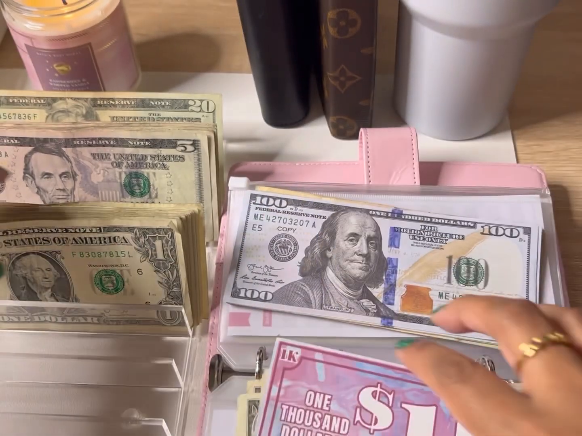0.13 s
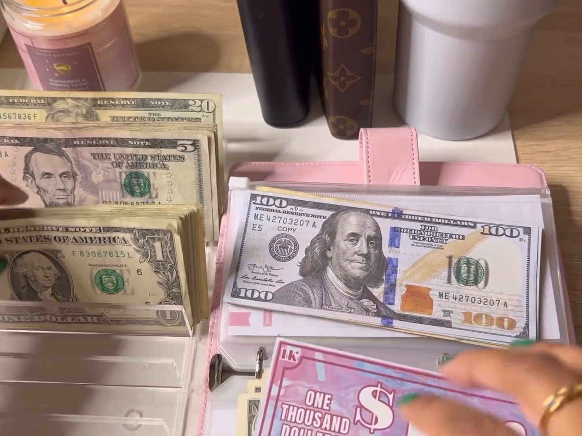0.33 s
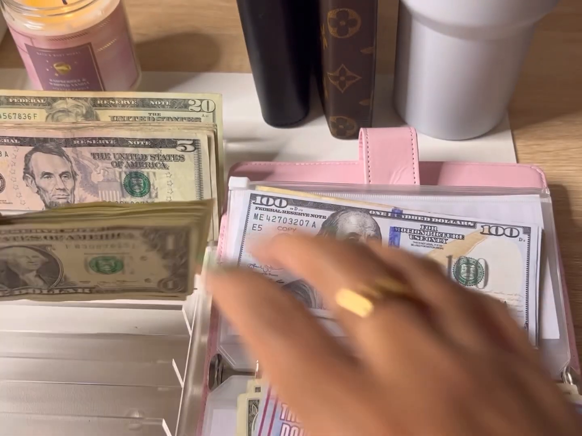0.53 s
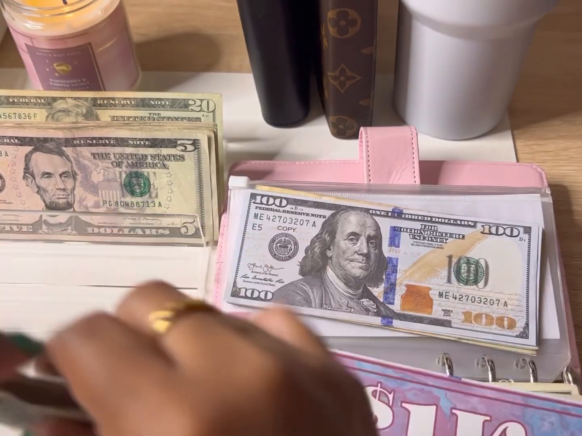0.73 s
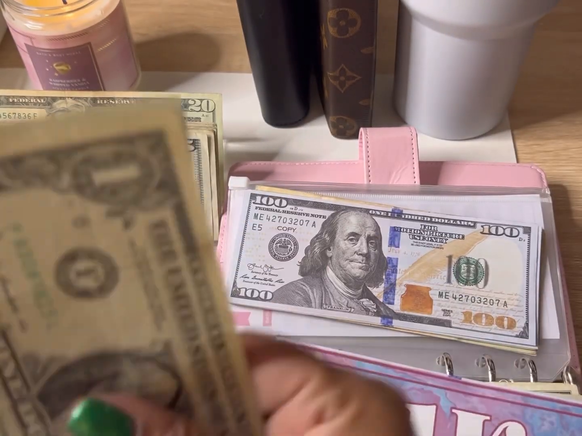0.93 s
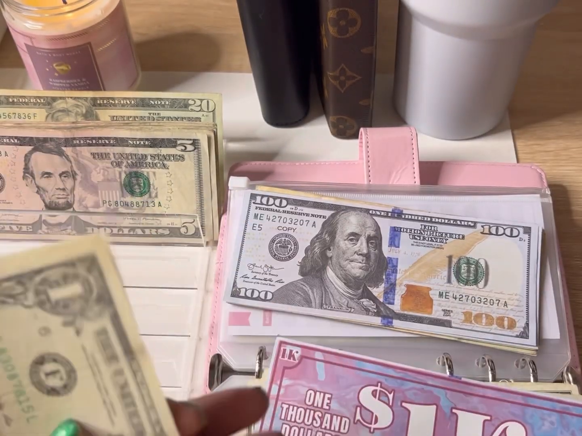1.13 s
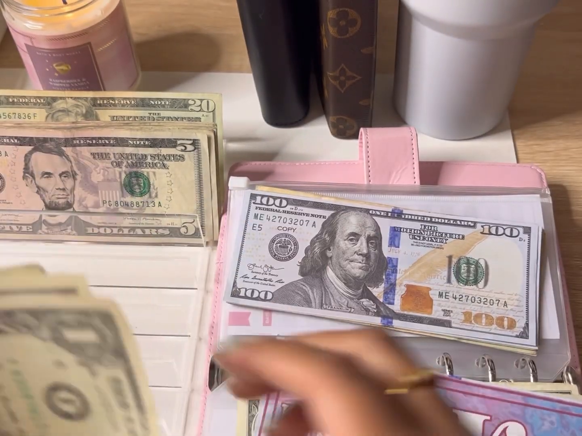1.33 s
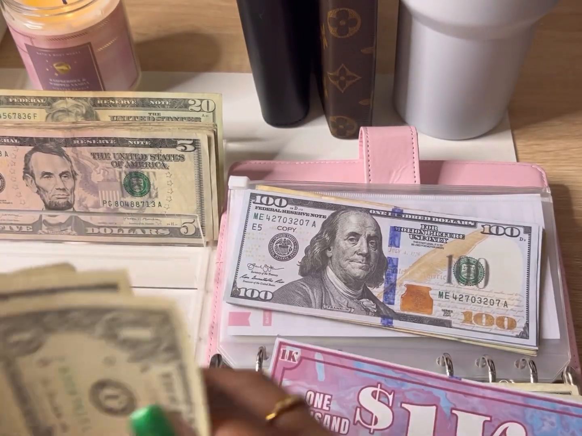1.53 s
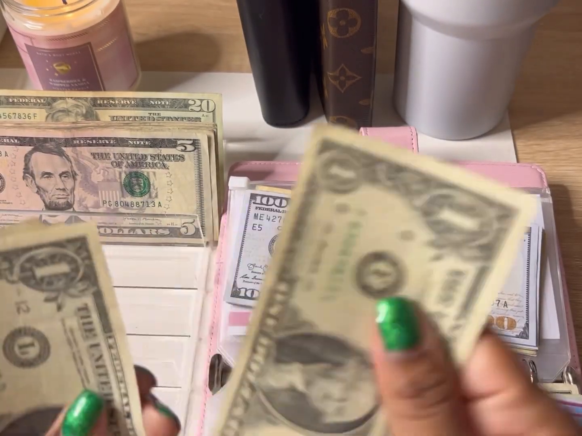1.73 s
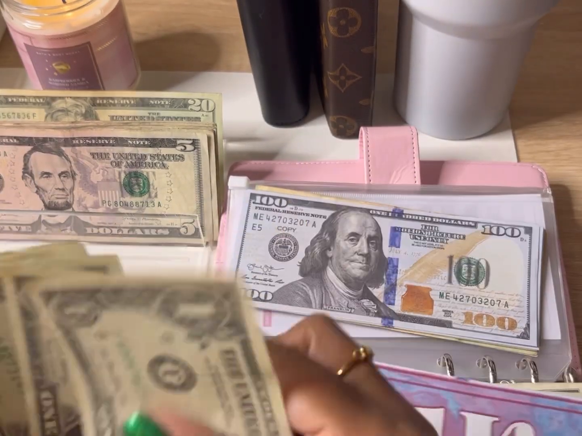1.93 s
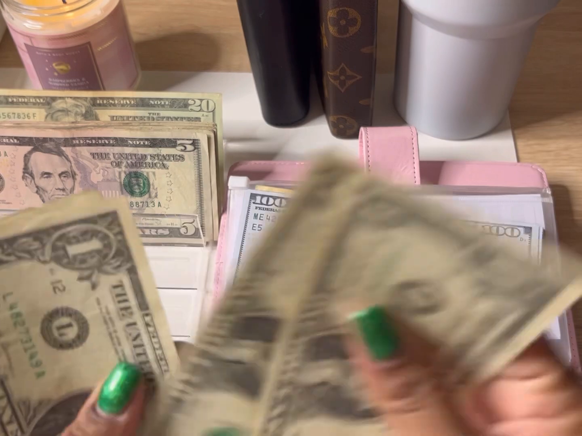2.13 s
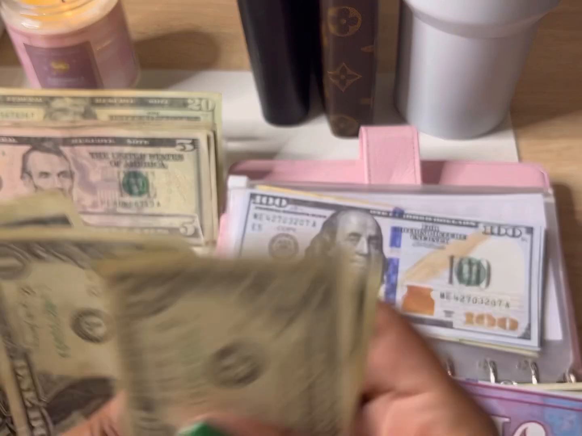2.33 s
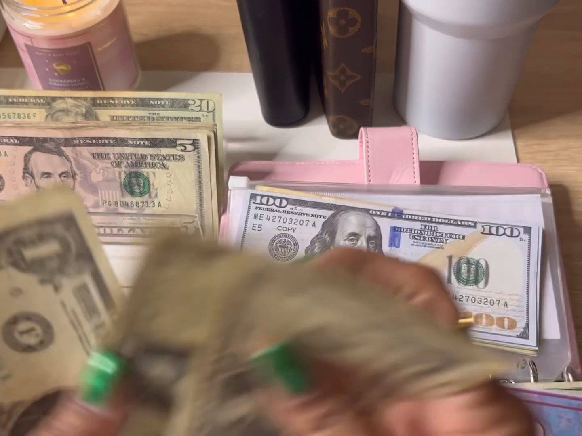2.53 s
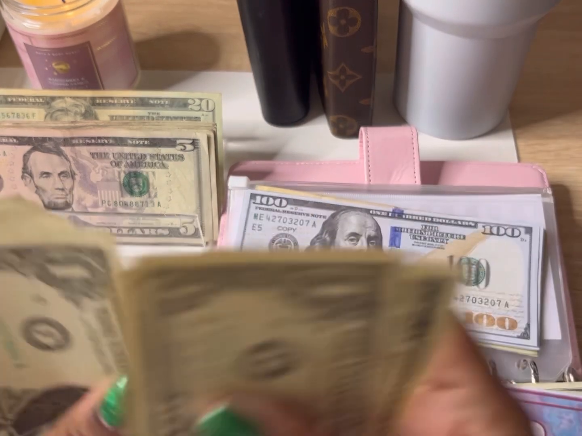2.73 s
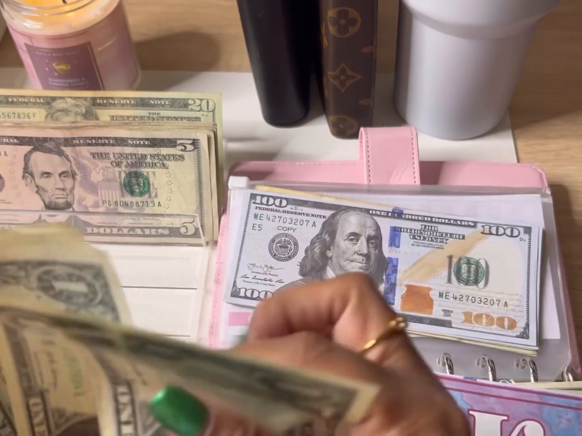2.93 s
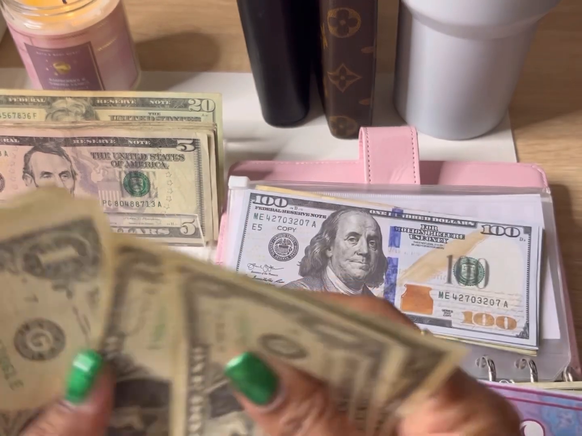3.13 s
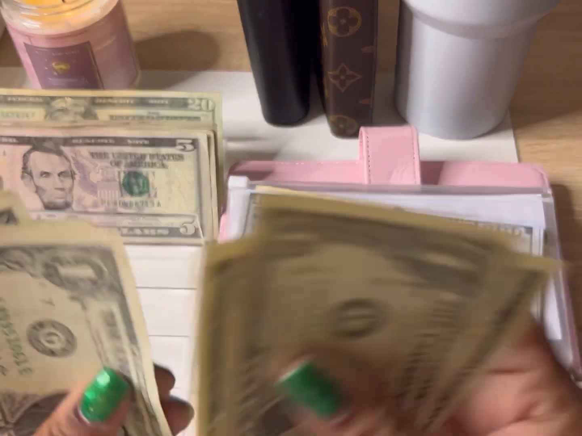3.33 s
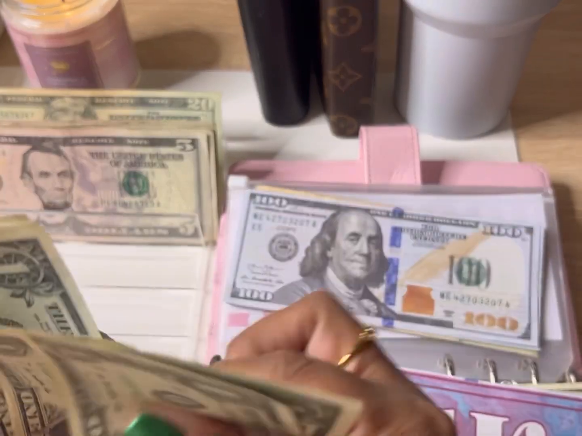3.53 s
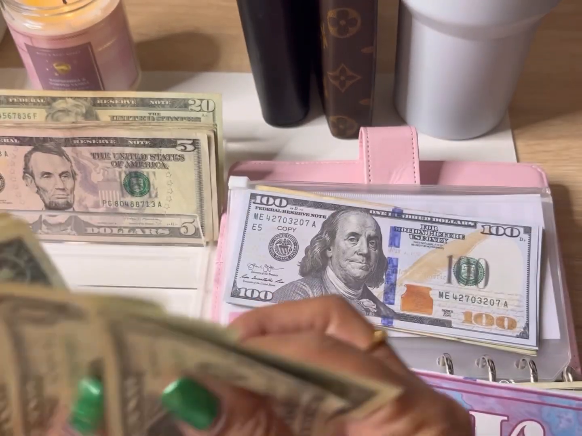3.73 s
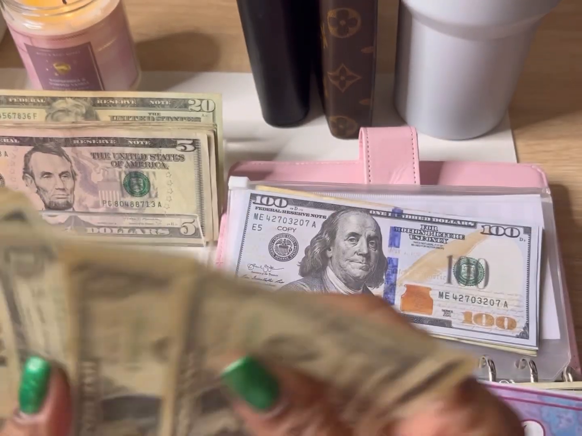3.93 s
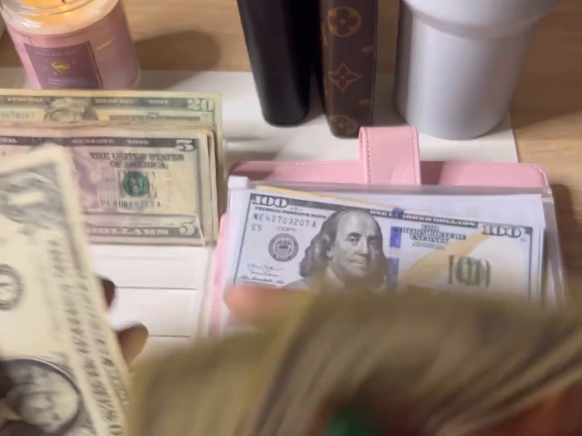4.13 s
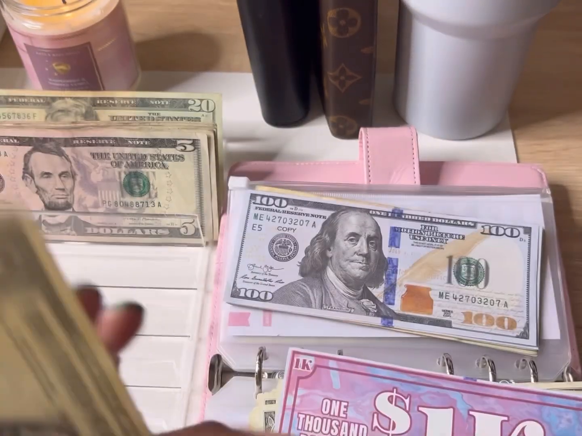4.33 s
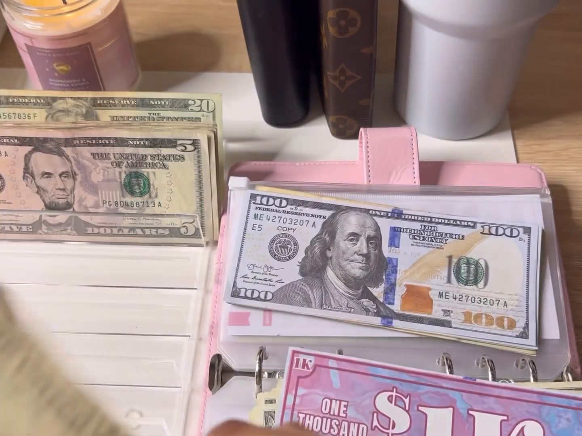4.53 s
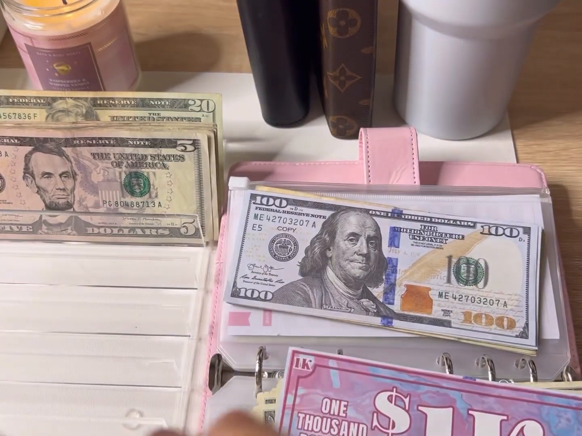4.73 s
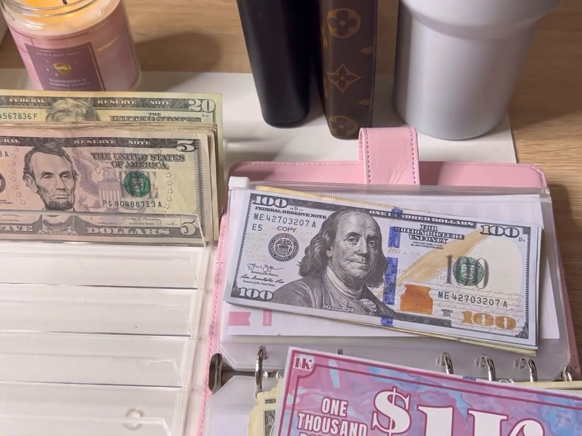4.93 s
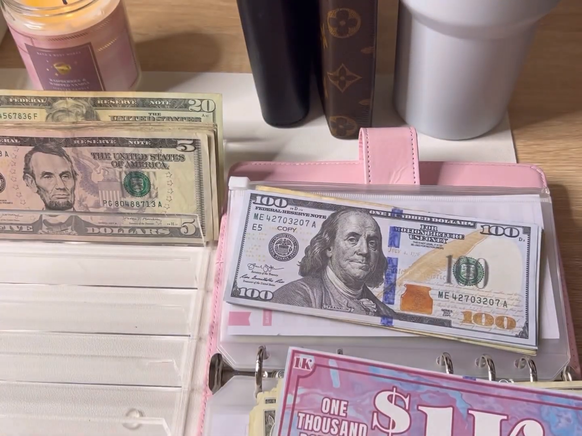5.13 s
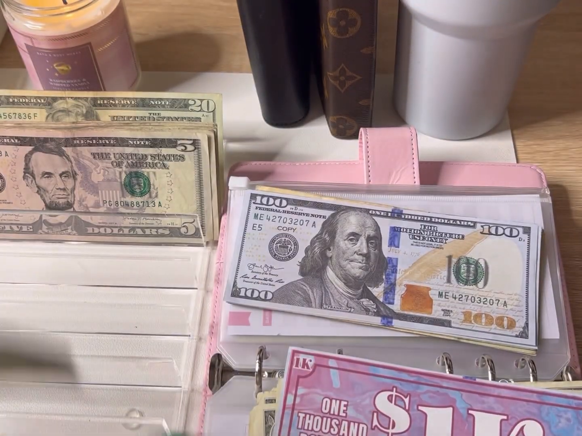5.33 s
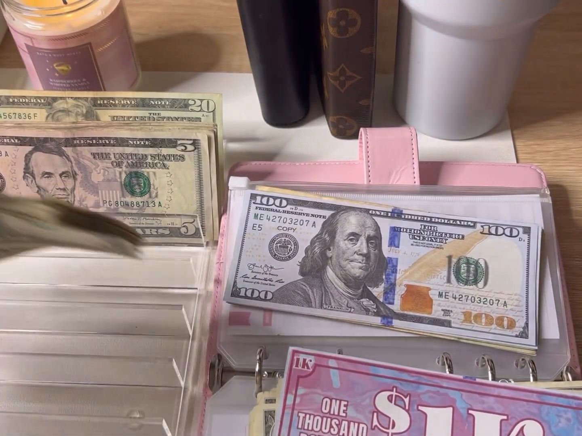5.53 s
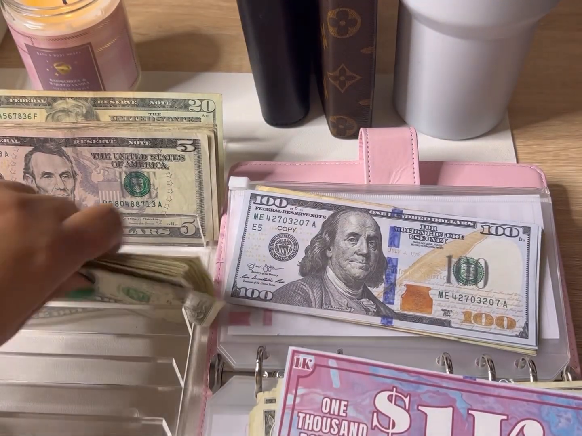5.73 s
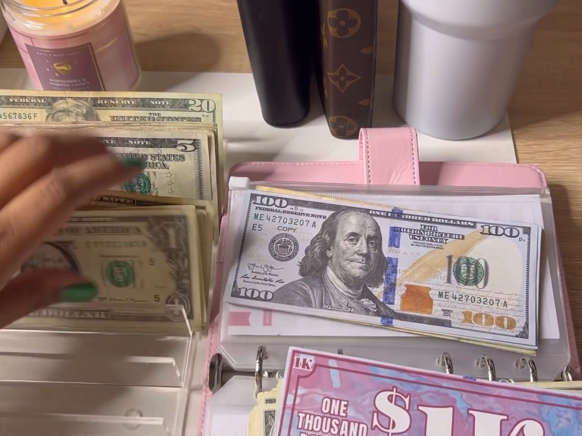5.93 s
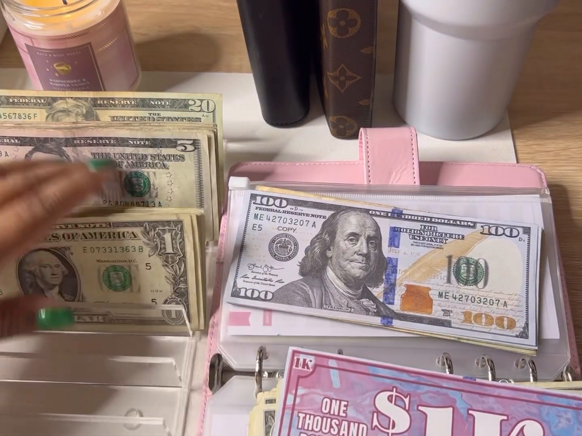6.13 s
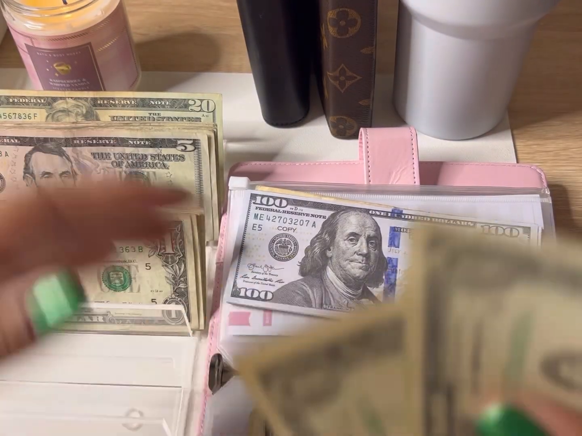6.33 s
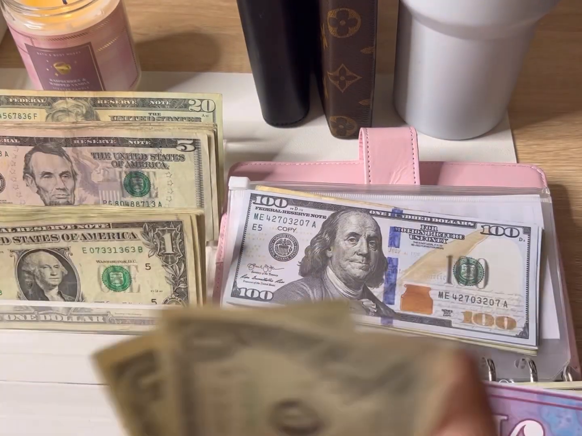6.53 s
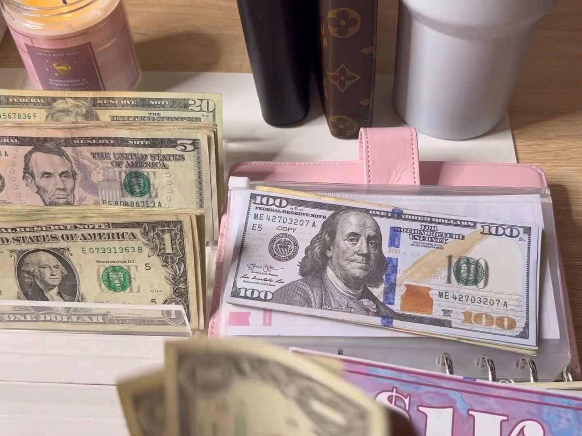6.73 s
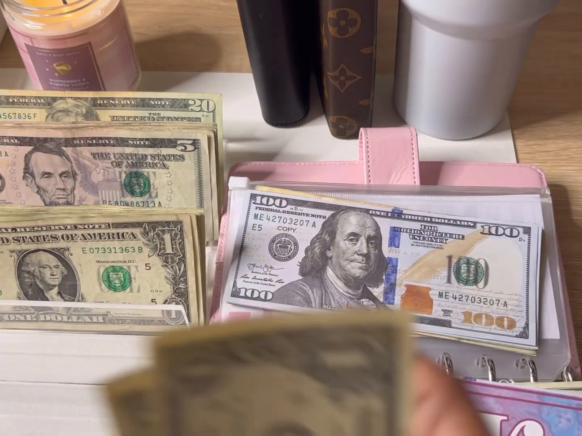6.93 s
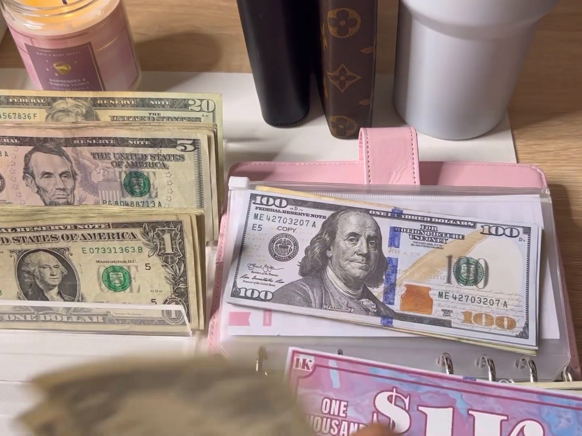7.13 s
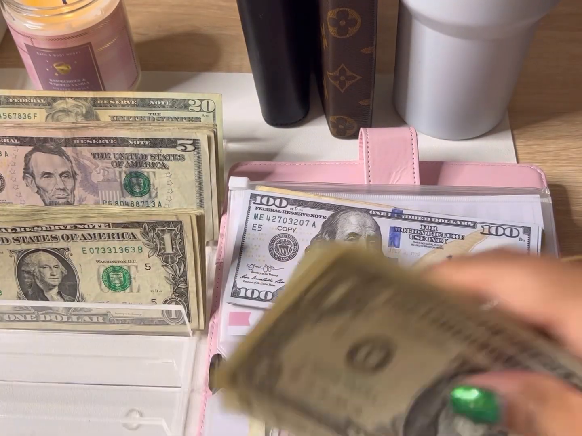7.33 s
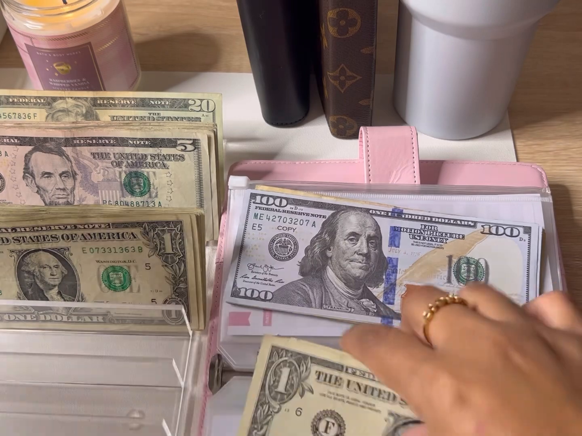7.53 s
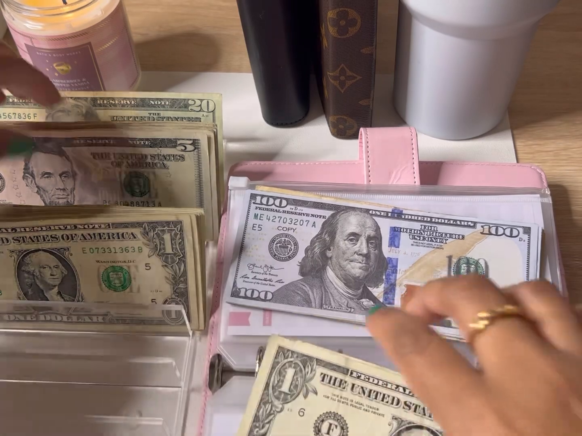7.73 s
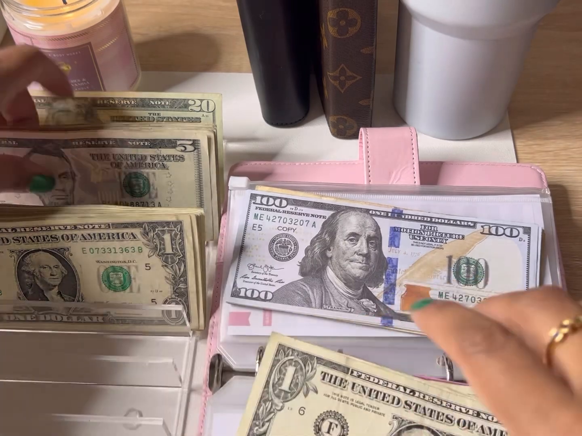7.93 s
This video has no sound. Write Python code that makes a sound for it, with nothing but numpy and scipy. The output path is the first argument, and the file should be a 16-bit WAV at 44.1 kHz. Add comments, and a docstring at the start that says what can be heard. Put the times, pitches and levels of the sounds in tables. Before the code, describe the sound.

Hands rub and draw banknotes over one another, quietly at first, then in a brisk irregular run of snaps, swishes and buckling sheets. After a muffled desk bump the movement eases into sparse rustles. A stack is squared and dropped into a hard plastic tray with short knocks, then a final small batch rustles and taps. Close stereo microphone, dry furnished room, faint low hum.

```python
"""Paper banknotes are pulled from a plastic tray, counted from hand to hand and put back, close by at a quiet desk.
From the start a low room hum (coloured noise) lies under hands that rub and sheets that slide in random stick-slip.
Soon creases snap and notes buckle (noise bursts around a pulse), and bending sheets flap (low bands of noise).
Near 4 and 6 s soft blows thump the desk (decaying low sines). After 5 s edges tap the tray (thicker bursts),
and wads knock on it (decaying sines at its modes)."""
import sys
import numpy as np
from scipy import signal
from scipy.io import wavfile

SR = 44100
rng = np.random.default_rng(int(sys.argv[2]) if len(sys.argv) > 2 else 0)


def materialize(psi):
    """Save the field psi as 16-bit PCM at rate SR to the path in sys.argv[1].

    A 1-D psi becomes a single channel; in a 2-D psi each row is a channel.
    """
    bounded = np.clip(np.atleast_2d(psi).T, -1, 1)
    quanta = np.round(bounded * 32767).astype(np.int16)
    wavfile.write(sys.argv[1], SR, quanta)


N = 352359

# Spectrum of rubbed paper. Each row: frequency in Hz, relative level per Hz in dB.
PAPER_SPECTRUM = [(45, -2), (72, 7.5), (680, -1), (1000, 4), (8000, 7), (16000, 2.5)]
# Fixed resonances that colour the paper sounds. Each row: frequency in Hz, width in Hz, boost in dB.
FIXED_RESONANCES = [(947, 93, 2.5), (1960, 37, 1.5)]
# Modes of the plastic tray. Each row: frequency in Hz, level relative to the knock in dB, t60 in seconds.
TRAY_MODES = [(264.5, 2, 0.092), (1163, -6, 0.11), (1560, 7, 0.051)]
# low flap, ringing sheet and bright crack: the three ranges of paper sound, in Hz
FLAP_BAND_HZ, SHEET_BAND_HZ, CRACK_BAND_HZ = (40, 700), (700, 3000), (3000, 17000)
BUILD_UP_S = .001  # small cracks grow over this time before the pulse of a contact


def sliding(hiss_gain, ring_gain, dull_hz=1600):
    """Stick-slip friction: fine fibres catch in a grainy hiss; coarser, rarer slips set the sheet ringing."""
    # a steady part is added to the random slips
    fibres = np.hypot(slips(per_s=480, size_db=5.5, length_s=0.0006), .7)
    catches = np.hypot(slips(per_s=190, size_db=5.5, length_s=0.0014), .6)
    hiss = coloured(fibres, PAPER_SPECTRUM, CRACK_BAND_HZ, wander_db=2.0)
    sheet = coloured(catches, PAPER_SPECTRUM, SHEET_BAND_HZ, wander_db=3.0)
    sheet = rms_one(resonate(sheet, FIXED_RESONANCES))
    # a slow stroke, with little hiss, rings dull
    quick = np.minimum(hiss_gain / ring_gain, 1)
    # reversed in time, the dull part is unrelated to the bright one
    dull_sheet = soften(np.fliplr(sheet), dull_hz)
    sheet = np.sqrt(quick) * sheet + np.sqrt(1 - quick) * dull_sheet
    return hiss_gain * hiss + ring_gain * sheet


def friction():
    """Power addition of unrelated noises: strokes and rubs sum to gains of hiss, sheet ring and rub."""
    # One note drawn over another. Each row: start in seconds, length in seconds, fastest moment as a share
    # of the length (0-1), friction hiss level in dB, ring of the sheet relative to the hiss in dB.
    strokes = [(0.22, 0.16, 0, -66.5, 5.5), (0.464, 0.048, 0.8, -62, 2.5), (0.68, 0.13, 0.17, -52.5, -2),
               (0.858, 0.25, 0.86, -61.5, -1.5), (1.074, 0.1, 0.93, -54, -3.5), (1.264, 0.14, 0.6, -57, -3),
               (1.46, 0.1, 0.9, -52, -7.5), (1.526, 0.16, 0.8, -41, -4), (1.704, 0.27, 0, -51, -8.5),
               (1.854, 0.39, 0.17, -53, 0), (1.997, 0.12, 0.45, -41, -6.5), (2.142, 0.33, 0.05, -51, -6),
               (2.335, 0.16, 0.1, -52.5, -1), (2.459, 0.11, 0.47, -41, -7.5), (2.56, 0.33, 0.25, -55, -5),
               (2.757, 0.22, 0.83, -53, -2.5), (2.952, 0.25, 0.69, -50, -6), (3.195, 0.31, 0.13, -55, -4),
               (3.382, 0.21, 0.33, -55, -5), (3.671, 0.13, 0.55, -53, -7), (3.852, 0.15, 0.64, -54, -2),
               (4.077, 0.11, 0.66, -55.5, 1), (4.194, 0.24, 0.25, -49.5, -4),
               (4.453, 0.16, 0.55, -55, -6.5), (4.773, 0.14, 0.56, -49, -4.5),
               (4.959, 0.038, 0.63, -61.5, 1), (5.117, 0.21, 0.65, -52.5, -6),
               (5.663, 0.12, 0.86, -54.5, 3), (5.778, 0.13, 0.13, -53.5, 0.5), (5.959, 0.047, 0.1, -46, -4),
               (6.132, 0.027, 0.6, -65.5, 0), (6.343, 0.081, 1, -62.5, -10), (6.436, 0.13, 0.4, -49, -4.5),
               (6.595, 0.36, 0.4, -59.5, -6), (6.959, 0.054, 0.6, -53.5, -10),
               (7.043, 0.15, 0.54, -54.5, -3.5), (7.431, 0.15, 0.57, -56, -4.5)]
    # Fingers and wad rubbing slowly. Each row: start in seconds, length in seconds, level in dB.
    rubs = [(-0.09, 0.53, -68.5), (0.825, 1, -71), (3.6, 0.73, -63.5), (3.974, 0.45, -62),
            (4.974, 0.37, -68), (5.388, 0.3, -77), (6.112, 0.31, -83), (7.27, 0.39, -70.5),
            (7.86, 0.16, -63)]
    rub_hiss_db = -6  # faint hiss and ring of a rub, relative to its middle band
    rub_gains = [from_db(db) * movement(start, length, 0.35) for start, length, db in rubs]
    rub = np.linalg.norm(rub_gains, axis=0)
    hiss = ring = rub * from_db(rub_hiss_db) + 1e-18
    for start, length, crest, hiss_db, ring_db in strokes:
        stroke = from_db(hiss_db) * movement(start, length, crest)
        hiss = np.hypot(hiss, stroke)
        ring = np.hypot(ring, from_db(ring_db) * stroke)
    return hiss, ring, rub


def movement(start, length, crest):
    """Friction grows with speed: a quick grip, an arch that follows the speed of the hand, a release."""
    grip_s, swell_db, release_t60_s = 0.0063, 10, 0.2
    t = np.arange(N) / SR - start
    crest = np.clip(crest, .05, .95)
    off_crest = np.interp(t / length, [0, crest, 1], [-1, 0, 1])
    arch_db = -swell_db * off_crest ** 2
    release_db = -60 * np.maximum(t - length, 0) / release_t60_s
    return np.clip(t / grip_s, 0, 1) * from_db(arch_db + release_db)


def rubbing(gain):
    """Slow stick-slip, soft and hollow: the rub stirs only a narrow middle band."""
    low_hz, high_hz = 920, 1902
    drive = slips(per_s=150, size_db=3.5, length_s=0.0069) * rng.standard_normal((2, N))
    mid, side = band_pass(drive, (low_hz, high_hz), order=3)
    return gain * rms_one(resonate(spread(mid, side, low_hz), FIXED_RESONANCES))


def flexing(ring_gain, drag=0.72):
    """Bending plates push air: notes buckle in soft, low flaps that swell and fade alike; sliding ones flutter."""
    # Wide swings of a bending note. Each row: time of the widest swing in seconds, flap level in dB.
    flaps = [(1.66, -44), (1.728, -47), (1.94, -45.5), (2.176, -48), (2.388, -54.5), (2.585, -48.5),
             (2.9, -60), (3.246, -51.5), (3.997, -48), (4.353, -53.5), (6.524, -52.5), (7.117, -57.5)]
    flutter_db = -2.5  # flutter of a sliding note relative to the ring of the sheet
    swell_s, soft_hz, top_hz = 0.027, 654, 1400  # the body of a flap reaches up into the ring of the sheet
    t = np.arange(N) / SR
    gain = ring_gain * from_db(flutter_db)
    for s, flap_db in flaps:
        gain = np.hypot(gain, from_db(flap_db) / np.cosh((t - s) / swell_s))
    buckling = np.hypot(slips(per_s=220, size_db=4.5, length_s=0.003), drag)
    body = coloured(buckling, PAPER_SPECTRUM, (FLAP_BAND_HZ[0], top_hz), wander_db=1.3)
    return gain * soften(resonate(body, FIXED_RESONANCES), soft_hz, order=1)


def snapping():
    """Sudden release of bending energy: each snap or buckle adds its own pitch; taps take the tray's pitches."""
    # Creases snapping, thin and dry. Each row: time in seconds, sheet level in dB,
    # crack relative to the sheet in dB.
    snaps = [(0.501, -55, -9), (0.551, -56, -37), (0.643, -63.5, -51), (0.691, -60, -3), (0.928, -57.5, -6),
             (1.0155, -55.5, -7), (1.0917, -48.5, -6), (1.143, -47, -12), (1.1665, -49.5, -21),
             (1.275, -55, -6), (1.3612, -42, 0), (1.4516, -42.5, 0), (1.4574, -53, 2), (1.5585, -43.5, 4.5),
             (1.6645, -42, -8), (1.8568, -48, 0.5), (1.9245, -50, 3), (1.9427, -38.5, -5), (2.022, -29, 7),
             (2.5054, -41.5, -4), (2.9007, -44.5, -11), (3.085, -61, 3), (3.588, -51.5, -17),
             (4.34, -42.5, -31), (5.103, -62.5, 6.5), (5.177, -64, 15), (7.514, -55.5, 6)]
    # Whole notes buckling with a low, papery pop. Each row: as for the snaps.
    buckles = [(1.362, -46.5, -8), (1.6209, -36, -14), (1.681, -38.5, -10), (1.7154, -40.5, -19),
               (1.7565, -47, -7), (1.79, -48.5, -8.5), (1.9, -47.5, -16), (1.962, -41.5, -22),
               (1.9669, -42, -9), (2.157, -59, 2), (2.1916, -47, -3.5), (2.424, -46, -3),
               (2.5588, -41.5, -7), (2.9414, -48, -5), (3.198, -49, -29), (3.4535, -48, -29),
               (3.4886, -45.5, -31), (3.976, -41.5, -28), (3.9961, -42.5, -30), (4.101, -42.5, -9),
               (4.1457, -49.5, -7), (4.405, -48.5, -23), (4.831, -51.5, -4), (5.8055, -51, 4.5)]
    # The edge of a wad tapping the tray, sheet after sheet. Each row: as for the snaps.
    taps = [(5.26, -38, 3), (5.699, -42.5, -9.5), (5.718, -31.5, -2), (5.7435, -44.5, -2),
            (5.9754, -47.5, 0), (5.9918, -46.5, -11.5), (6.102, -57, -16.5), (6.4777, -49.5, 10.5),
            (7.4424, -46.5, -3), (7.776, -63.5, -9), (7.858, -48, -5.5), (7.8937, -38.5, -10),
            (7.977, -37, 4.5)]
    # each kind: its rows, low flap relative to the sheet in dB, thickness (longer, more ragged than a snap)
    kinds = [(snaps, -17, 1), (buckles, -1, 1.5), (taps, -16, 1.9)]
    ring_width_hz, ring_boost_db = 220, 7
    tray_rings = [(hz, ring_width_hz, ring_boost_db) for hz, _, _ in TRAY_MODES]
    out = np.zeros((2, N + SR))
    for rows, flap_db, thick in kinds:
        for s, sheet_db, crack_db in rows:
            bend = (rng.uniform(*SHEET_BAND_HZ), ring_width_hz, ring_boost_db)
            rings = tray_rings if rows is taps else list(FIXED_RESONANCES) + [bend]
            hit = from_db(sheet_db) * contact(rings, flap_db, crack_db, thick)
            start = int((s - BUILD_UP_S) * SR)
            out[:, start:start + len(hit.T)] += hit
    return out[:, :N]


def contact(rings, flap_db, crack_db, thick, contact_hz=3800, crack_hz=5000):
    """Impulse response in three ranges: low flap, ringing sheet, bright crack; less crack, duller sheet."""
    flap = burst((110, FLAP_BAND_HZ[1]), rings, t60=.032, crumple=thick)
    sheet = burst(SHEET_BAND_HZ, rings, t60=.011 * thick, crumple=1.5 * thick)
    crack = burst(CRACK_BAND_HZ, rings, t60=.011 * thick, crumple=1.5 * thick)
    sheet = soften(sheet, contact_hz * from_db(crack_db / 4))
    return from_db(flap_db) * flap + sheet + from_db(crack_db) * soften(crack, crack_hz, order=1)


def burst(band, resonances, t60, crumple):
    """Crackling release: small cracks build up to a pulse, run out quickly and leave a faint shiver."""
    shiver_db, shiver_t60_s = -16, 0.15
    level_span_s = .006  # a level of 0 dB means unit power over this span
    t = (np.arange(SR // 10) - int(BUILD_UP_S * SR)) / SR
    after = np.maximum(t, 0)
    decay = from_db(-60 * after / t60) + from_db(shiver_db - 60 * after / shiver_t60_s)
    shape = np.clip(1 + t / BUILD_UP_S, 0, 1) * decay
    cracks, side = rng.standard_normal((2, len(t))) * shape / np.linalg.norm(shape)
    pulse = t == 0
    pair = spread(crumple * cracks - pulse, crumple * side, np.sqrt(np.prod(band)))
    sound = resonate(band_pass(pair, band), resonances)
    return sound / np.linalg.norm(sound) * np.sqrt(2 * level_span_s * SR)


def tray():
    """Modal synthesis: each knock sets all modes of the tray ringing as decaying sines."""
    # Wads knocking on the plastic tray. Each row: time in seconds, level in dB.
    knocks = [(5.72, -42), (5.734, -42), (7.893, -59.5)]
    out = np.zeros(N)
    for s, knock_db in knocks:
        t = np.maximum(np.arange(N) / SR - s, 0)
        for hz, mode_db, t60 in TRAY_MODES:
            out += from_db(knock_db + mode_db - 60 * t / t60) * np.sin(2 * np.pi * hz * t)
    return out


def thumping(rise_s=0.023):
    """Soft impact on a damped mode: a blow swells and dies as one low sine."""
    # Blows of hands and wad that reach the desk. Each row: time in seconds, frequency in Hz,
    # level in dB before the soft rise lowers it, t60 in seconds.
    thumps = [(3.967, 151, -27.5, 0.13), (3.992, 239, -28.5, 0.1), (6.006, 49.9, -35.5, 0.35)]
    out = np.zeros(N)
    for s, hz, level_db, t60 in thumps:
        t = np.maximum(np.arange(N) / SR - s, 0)
        envelope = from_db(level_db - 60 * t / t60) * (1 - np.exp(-t / rise_s))
        out += envelope * np.sin(2 * np.pi * hz * t)
    return out


def room(x, t60=0.042, wall_hz=6000, wet_db=-15):
    """Diffuse reverberation: convolution with decaying noise gives the dull echoes of a small furnished room."""
    t = np.arange(SR // 2) / SR
    echoes = rng.standard_normal((2, len(t))) * from_db(-60 * t / t60) * (t > .004)
    echoes = band_pass(echoes, (120, min(wall_hz, .45 * SR)), order=1)
    echoes /= np.linalg.norm(echoes[0])
    return from_db(wet_db) * signal.fftconvolve(x, echoes, axes=1)[:, :N]


def room_hum():
    """Broadband background noise: bands weighted towards the bass wander slowly in level."""
    # Spectrum of the room background. Each row: frequency in Hz, relative level per Hz in dB.
    room_tone = [(25, -29.5), (50, 1), (150, -4.5), (400, -19), (1700, -31.5), (2400, -38.5), (16000, -49)]
    level_db = -61.5
    return from_db(level_db) * coloured(1, room_tone, (22, 17000), wander_db=2.5, wander_rate=9)


def slips(per_s, size_db, length_s):
    """Shot noise as the force of catching fibres: random slips of uneven size, each dying quickly; rms 1."""
    uneven_db = size_db * np.minimum(rng.exponential(1, N), 2.5)
    sizes = from_db(uneven_db) * (rng.random(N) < per_s / SR)
    power = signal.lfilter([1], [1, -np.exp(-1 / (length_s * SR))], sizes ** 2 + 1e-18)
    return rms_one(np.sqrt(power))


def coloured(force, spectrum, band, wander_db, wander_rate=24):
    """Subtractive synthesis: force-driven noise in about half-octave bands of wandering level; stereo, rms 1."""
    edges = np.geomspace(*band, int(2 * np.log2(band[1] / band[0])) + 2)
    drive = force * rng.standard_normal((2, 2, N))
    out = 0
    for k, (low, high) in enumerate(zip(edges, edges[1:])):
        hz = np.sqrt(low * high)
        gain = from_db(at_hz(spectrum, hz) + wander_db * drift(wander_rate))
        # neighbouring bands take turns on two unrelated drives
        mid, side = band_pass(drive[k % 2], (low, high))
        out = out + gain * spread(mid, side, hz)
    return rms_one(out)


def resonate(x, resonances):
    """Two-pole resonance added to the direct sound: raises or hollows out narrow ranges of pitch."""
    out = x
    for hz, width, boost_db in resonances:
        r = np.exp(-np.pi * width / SR)
        zeros = np.array([1, 0, -1]) * (1 - r * r) / 2
        poles = [1, -2 * r * np.cos(2 * np.pi * hz / SR), r * r]
        out = out + (from_db(boost_db) - 1) * signal.lfilter(zeros, poles, out)
    return out


def soften(x, hz, order=4):
    """Low-pass of a soft contact: less treble at the same power."""
    dull = signal.sosfilt(signal.butter(order, min(hz, .45 * SR), fs=SR, output="sos"), x)
    return rms_one(dull) * np.std(x)


def spread(mid, side, hz):
    """Interchannel coherence: left and right from a shared and an opposed part."""
    # Two microphone ports. Each row: frequency in Hz, likeness of the ports (0-1).
    likeness = [(60, 0.94), (1000, 0.76), (4000, 0.4), (12000, 0.4)]
    angle = np.arccos(np.clip(at_hz(likeness, hz), 0, 1)) / 2
    shared, opposed = np.cos(angle) * mid, np.sin(angle) * side
    return np.array([shared + opposed, shared - opposed])


def pan_notes(x):
    """Level panning: the balance of the ports follows where the hands work."""
    # Place of the hands. Each row: time in seconds, left minus right in dB.
    place = [(6.1, -.6), (6.6, -4.5), (8, -1.5)]
    s, left_minus_right_db = np.transpose(place)
    pan_db = np.interp(np.arange(N) / SR, s, left_minus_right_db)
    return x * from_db(np.array([pan_db, -pan_db]) / 2)


def band_pass(x, band, order=2):
    """Causal Butterworth band-pass: keeps one range of frequency."""
    return signal.sosfilt(signal.butter(order, band, "band", fs=SR, output="sos"), x + 1e-18)


def drift(rate):
    """Slow random modulation: chance points per second joined by lines, rms 1."""
    points = rng.standard_normal(int(rate * N / SR) + 2)
    return rms_one(np.interp(np.arange(N) * rate / SR, np.arange(len(points)), points))


def at_hz(points, hz):
    """Logarithmic pitch scale: reads a curve on a log-frequency axis."""
    f, value = np.transpose(points)
    return np.interp(np.log(hz), np.log(f), value)


def from_db(db):
    """Level to amplitude: decibels to gain."""
    return 10 ** (np.asarray(db) / 20)


def rms_one(x):
    """Power normalisation: scales to unit rms."""
    return x / np.sqrt(np.mean(x ** 2) + 1e-20)


def scene():
    """Superposition: the notes in the hands, the tray, the desk and the room around them add up."""
    hiss, ring, rub = friction()
    paper = sliding(hiss, ring) + rubbing(rub) + flexing(ring) + snapping()
    notes = pan_notes(paper + tray())
    return notes + room(notes) + thumping() + room_hum()


def record(dry):
    """Linear filtering: the left port lags and is weaker near 4 kHz; treble is hollowed and the top cut."""
    port_hz, port_width_hz, port_db = 4000, 3000, 0.43  # raised on the right, lowered on the left
    lag = .3  # allpass coefficient: about half a sample of delay
    cutoff_hz = 15800
    # Hollows in the treble of the microphone. Each row: frequency in Hz, width in Hz.
    mic_dips = [(10520, 930), (13880, 140)]
    dip_db = -21  # per pass; there are two passes
    left, right = dry
    left = signal.lfilter([lag, 1], [1, lag], left)
    left = resonate(left, [(port_hz, port_width_hz, -port_db)])
    right = resonate(right, [(port_hz, port_width_hz, port_db)])
    dips = [(hz, width, dip_db) for hz, width in mic_dips]
    heard = resonate(resonate(np.array([left, right]), dips), dips)
    return signal.sosfilt(signal.ellip(10, .2, 80, cutoff_hz, fs=SR, output="sos"), heard)


dry = scene()
out = record(dry)
materialize(out)
```